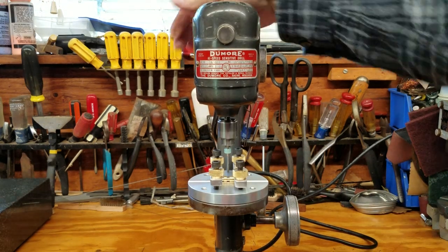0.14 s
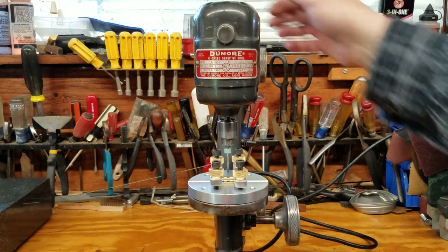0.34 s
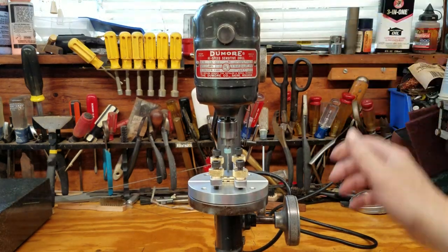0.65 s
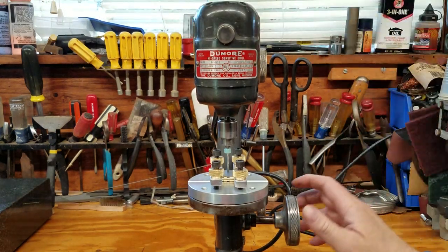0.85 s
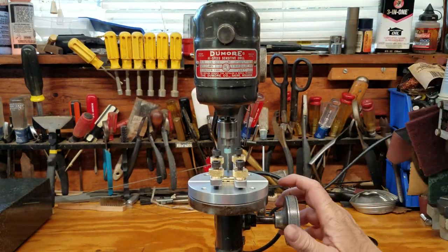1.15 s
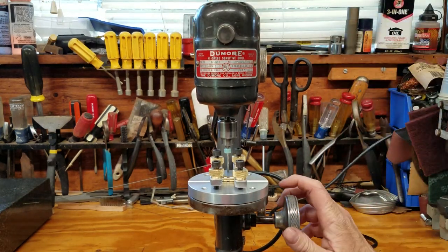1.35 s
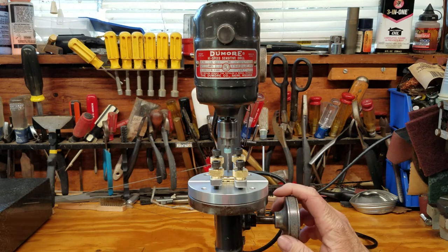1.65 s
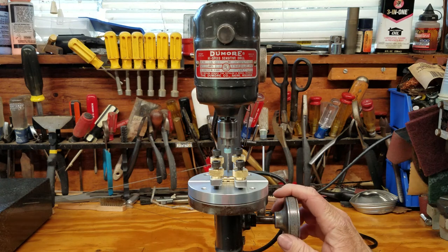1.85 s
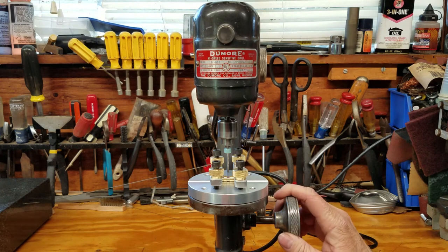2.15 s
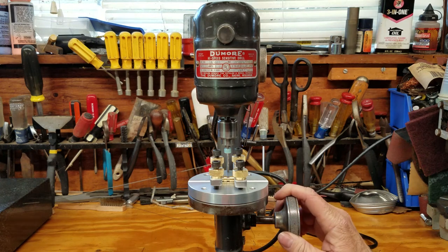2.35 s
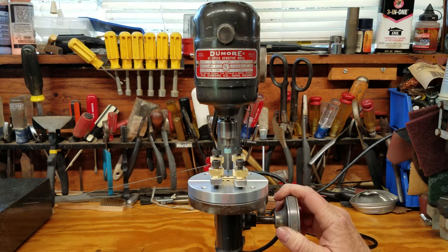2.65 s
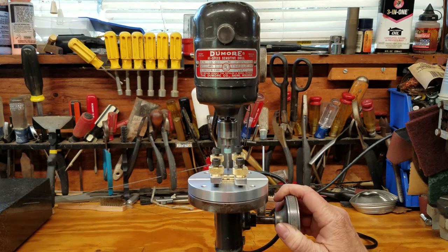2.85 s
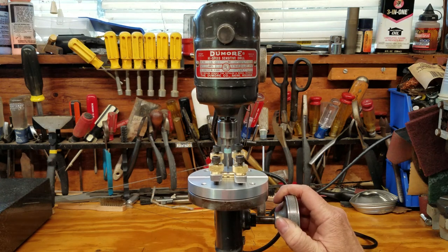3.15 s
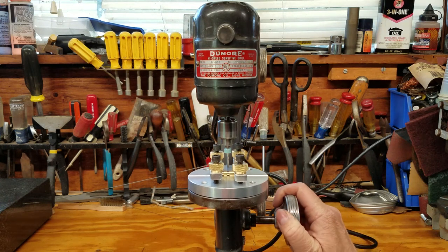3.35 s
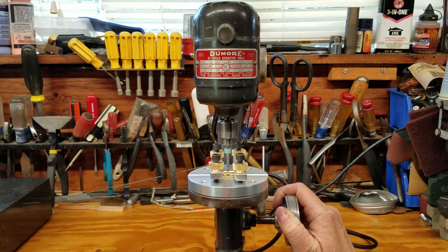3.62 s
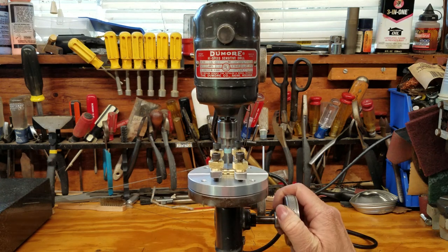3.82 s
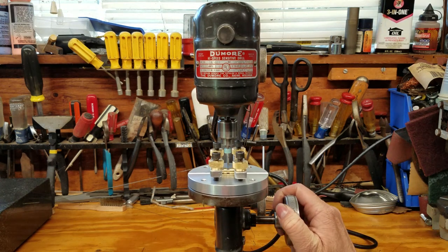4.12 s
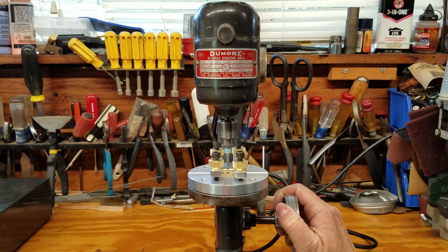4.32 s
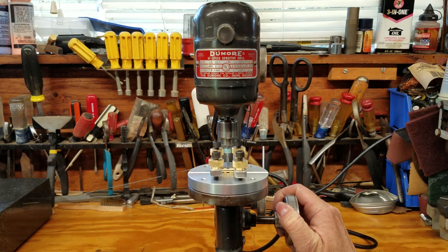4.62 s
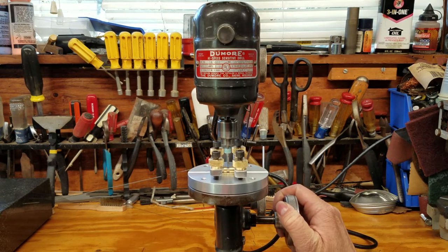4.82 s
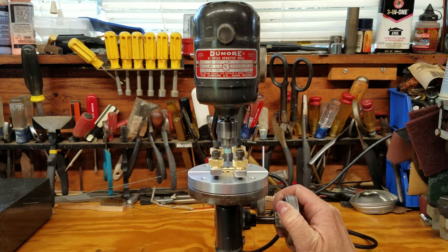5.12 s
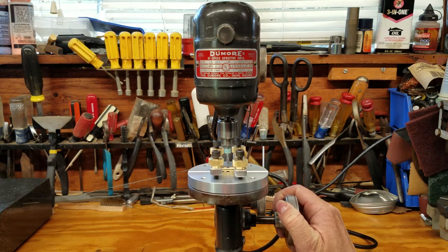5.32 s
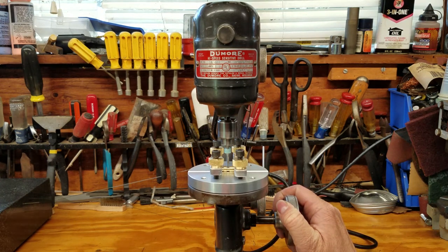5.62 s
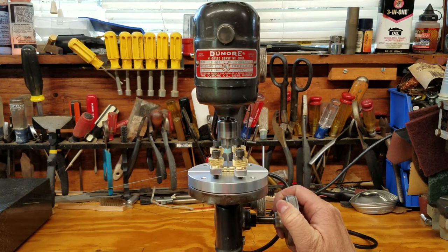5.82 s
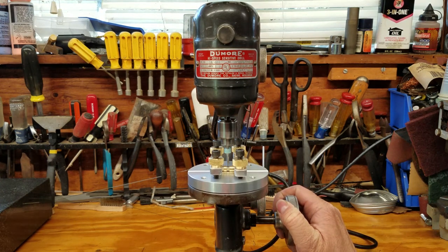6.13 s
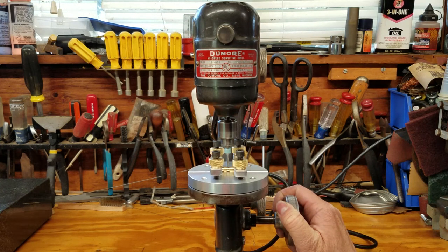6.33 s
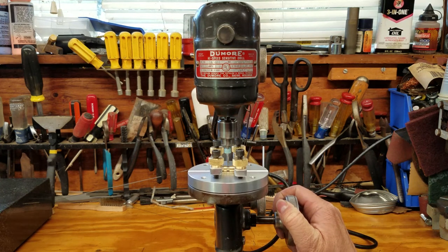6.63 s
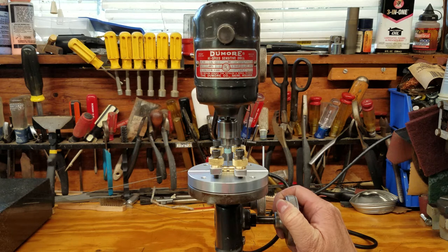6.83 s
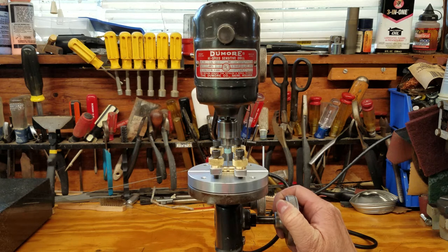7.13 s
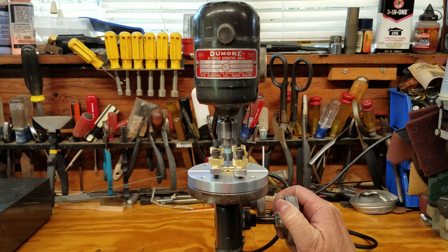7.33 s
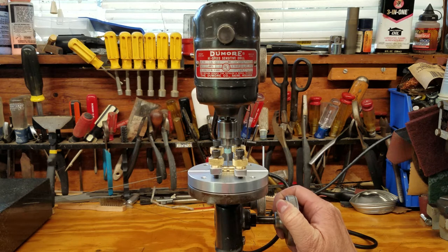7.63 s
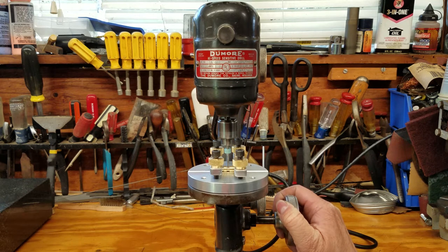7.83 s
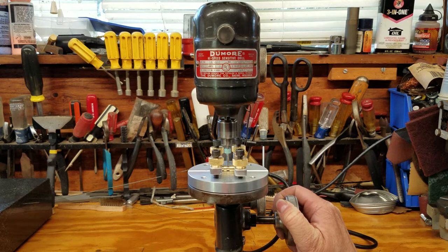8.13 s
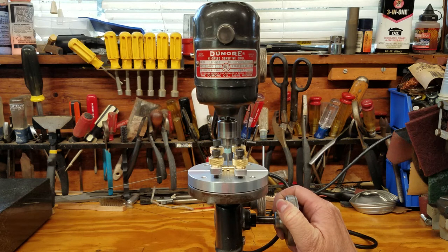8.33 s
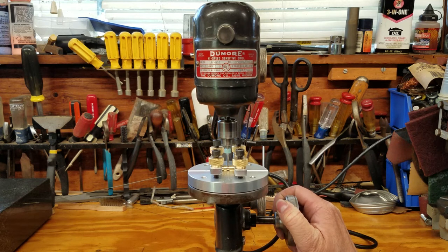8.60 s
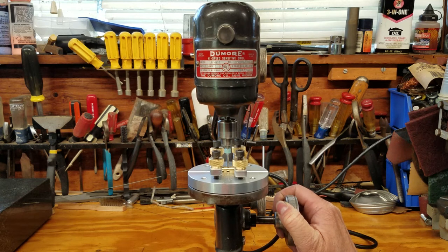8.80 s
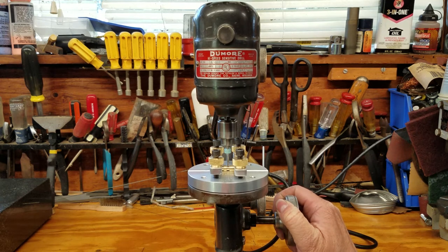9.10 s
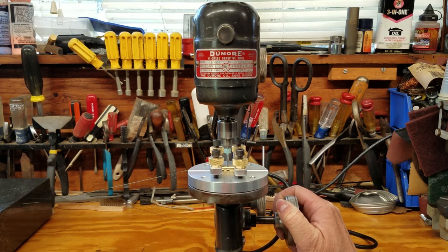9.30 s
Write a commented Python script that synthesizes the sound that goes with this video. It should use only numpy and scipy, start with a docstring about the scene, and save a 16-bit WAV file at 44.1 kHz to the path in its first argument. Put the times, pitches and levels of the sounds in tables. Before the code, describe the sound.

A small brush motor on a bench drill press, heard very close in a workshop. A short ring of the casing, then a fan whine climbs quickly, then ever more slowly, to a piercing steady pitch over low hum, bearing song and airy hiss. One dull knock of the hand wheel early on. Late, four feeds into metal make the pitch sag slightly, with brief dry scrapes.

```python
"""A small brush motor on a bench drill press, heard close up in a workshop: the casing rings at the start
while the motor runs up from about 6,800 towards 18,600 rpm, and the hand wheel knocks once on the way.
Sines locked to the shaft make the fan whine, unbalance hum and bearing song, which all glide upwards;
filtered noise makes the air, casing and brush rush. After 6.6 s the bit is fed into metal four times:
the speed sags, the hum is damped, and short bursts of band noise make the bit scrape."""
import sys
import numpy as np
from scipy import signal
from scipy.fft import rfft, irfft
from scipy.io import wavfile

SR = 44100
rng = np.random.default_rng(int(sys.argv[2]) if len(sys.argv) > 2 else 0)


def store_pcm(level_fs):
    """Save levels as 16-bit WAV."""
    pcm = np.round(np.clip(level_fs, -1, 1) * 32767).astype(np.int16)
    wavfile.write(sys.argv[1], SR, np.atleast_2d(pcm).T)


N = 417186
TIME = np.arange(N) / SR
BINS = np.arange(N // 2 + 1) * SR / N  # Hz
TOP_SPEED_HZ = 310.84  # free running speed of the shaft, turns per second


def undb(db):
    """Decibels to gain."""
    return np.exp(np.asarray(db) * (np.log(10) / 20))


def octaves(hz):
    """Octaves of shaft speed relative to the top speed."""
    return np.log2(hz / TOP_SPEED_HZ)


def spectra(table):
    """The columns of a frequency table, drawn out bin by bin along a log frequency axis."""
    hz, *columns = np.transpose(table)
    return [np.interp(np.log(BINS + 1), np.log(hz), column) for column in columns]


def bump(hz, centre_hz, width_hz):
    """Bell shape of a resonance, 1 at its centre and half at the edges of its width."""
    return 1 / (1 + (2 * (hz - centre_hz) / width_hz) ** 2)


def response(hz, table):
    """Gain in dB of a set of peaks and dips, one row for each level column."""
    return sum(np.outer(db, bump(hz, centre_hz, width_hz)) for centre_hz, width_hz, *db in table)


def walk(rate):
    """Slow random wander with a spread near 1, through `rate` random points per second."""
    points = rng.standard_normal(2048)
    return 1.203 * np.interp(TIME * rate, np.arange(len(points)), points)


def place(x, pan_db):
    """Share a sound between left and right at constant power; pan is left minus right."""
    tilt = undb(pan_db)
    return np.array([x * tilt, x]) * np.sqrt(2 / (1 + tilt ** 2))


def held(start, end, bite_s=0.18):
    """1 while the bit is in the metal, with short ramps as it takes hold and lets go."""
    return np.clip(np.minimum(TIME - start, end - TIME) / bite_s + .5, 0, 1)


# the run-up closes on the top speed in a quick and a slow stage: (speed still to gain f/Hz, time constant t/s)
RUN_UP = [(75.3, .343), (121.9, 1.508)]
# feeds of the bit into the metal: (start t/s, end t/s, speed loss under lasting drag f/Hz,
# hum damping reached towards the end level/dB)
CUTS = [(6.62, 6.86, 3.6, 6), (7.36, 7.57, 9.4, 6), (8.09, 8.56, 10.2, 10), (9.09, 9.6, 10.1, 16)]


def shaft_speed(inertia_s=1.05):
    """The motor runs up towards its top speed; each cut drags on it and inertia smooths the sag."""
    to_gain = sum(gap_hz * np.exp(-TIME / seconds) for gap_hz, seconds in RUN_UP)
    drag = sum(drag_hz * held(start, end) for start, end, drag_hz, _ in CUTS)
    keep = np.exp(-1 / (inertia_s * SR))
    sag = signal.lfilter([1 - keep], [1, -keep], drag)
    return TOP_SPEED_HZ - to_gain - sag


# shaft tones, the six-blade whine loudest: (cycles per turn, level/dB at top speed before trim and air path,
# slope level/dB per octave of speed, rise in a cut level/dB, left minus right level/dB)
TONES = [(2, -48.0, 49.1, 12, -7.7), (4, -39.4, 24, 5.8, 4.4), (6, -14.0, 26.5, -0.3, -0.2),
         (12, -37.1, 19.5, 0.4, -6.3), (18, -45.6, 28.1, -1.1, -0.0)]
# standing waves between fan and listener, peaks and nulls: (f/Hz, width f/Hz, left level/dB, right level/dB)
STANDING_WAVES = [(850, 110, 9, 6), (930.3, 93.4, 15.1, 3.3), (1100.9, 93.0, -15.7, -14.7),
                  (1215, 80, 3, 5), (1322.9, 136.7, -12.7, -4.6), (1519.9, 81.1, -13.2, -5.3),
                  (1639.8, 11.4, 5.0, -7.8), (1682.8, 36.4, -6.9, -5.2), (1745, 30, -3, -1),
                  (1792.5, 110.7, -31.3, -41.9), (1794.2, 59.7, 24.1, 34.0), (1817, 24, 3.5, 1),
                  (1846.8, 5.2, -4.0, -16.1), (2760, 120, 11, 14), (3263.5, 85.0, 7.7, 7.0),
                  (3664.1, 26.0, -1.1, -23.4), (4600, 110, 3, 9), (5220, 220, 2, 8), (5465, 120, 10, 13)]


def fan(angle, hz, cutting, tones_db=-1.8, whine_lag=0.91, flutter_db=0.64,
        tone_flutter_db=1.7, tone_blur=0.37, cavity_share=0.36):
    """Six blades whine cleanly, weaker shaft tones waver; all swell and fade gliding through standing waves."""
    path_db = response(BINS, STANDING_WAVES) + cavity_share * response(BINS, CAVITIES)
    _, lead = spectra(PORTS)
    out = np.zeros((2, N))
    for multiple, level_db, octave_db, cut_db, pan_db in TONES:
        tone_hz = multiple * hz
        db = level_db + octave_db * octaves(hz) + cut_db * cutting
        db = db + np.array([[pan_db], [-pan_db]]) / 2
        db = db + np.array([np.interp(tone_hz, BINS, side) for side in path_db])
        phase = multiple * angle
        if multiple == 6:  # the blades
            db = db + flutter_db * walk(25)
            left_ahead = -whine_lag  # radians
        else:
            db = db + tones_db + tone_flutter_db * walk(18)
            phase = phase + tone_blur * walk(30)
            left_ahead = np.interp(tone_hz, BINS, lead)
        out += undb(db) * np.sin(np.array([phase + left_ahead, phase]))
    return np.sqrt(2) * out  # levels are RMS


# resonances and dead spots of column and bench, crossed by the hum: (f/Hz, width f/Hz, level/dB)
STAND = [(143.6, 21.4, 7.7), (177.8, 48.9, -16.4), (219.3, 4.6, -9.5), (238.6, 15.7, 5.4),
         (254.6, 5.8, -17.4), (272.4, 22.4, 3.1), (302.0, 9.0, -11.9)]


def hum(angle, hz, level_db=-25, octave_db=22, pan_db=-2.7, flutter_db=0.9):
    """Unbalance shakes the stand once a turn; the bit steadies the spindle as it sinks in."""
    damped_db = 0
    for start, end, _, damping_db in CUTS:
        depth = (TIME - start) / (end - start)
        damped_db = damped_db + damping_db * held(start, end) * depth
    db = level_db + octave_db * octaves(hz) + response(hz, STAND)[0] - damped_db
    return np.sqrt(2) * place(undb(db + flutter_db * walk(14)) * np.sin(angle), pan_db)


# ball impacts per shaft turn in each bearing; the cage swings them once in each of its own turns
UPPER_BALLS, LOWER_BALLS, CAGE = 3.531, 3.235, .367
# upper cage sideband over the lower one; the harmonic itself against its sidebands
UPPER_SIDE_DB, CENTRE_DB = 3.5, -13
# harmonics of the ball impacts, before housing and slope: (harmonic, upper bearing loose level/dB,
# settled level/dB, lower bearing loose level/dB, settled level/dB)
BALL_HARMONICS = [(3, -43, -47, -50, -56), (4, -45.5, -39.5, -39.5, -45), (5, -44, -48, -68.5, -49),
                  (6, -44.5, -50.5, -51, -52), (7, -48, -50, -50, -45.5), (8, -71, -49, -42.5, -44),
                  (9, -45, -43.5, -56, -71), (10, -44, -39, -54, -79), (11, -51, -37.5, -53, -56),
                  (12, -53, -54, -51, -57), (13, -57, -55, -50, -65), (14, -51, -53, -50, -51),
                  (15, -60, -55, -63, -50), (16, -66, -60, -59, -49), (17, -61, -60, -61, -51)]
# single tones of commutator and bearings, before housing and slope: (cycles per turn, loose level/dB,
# settled level/dB, left minus right level/dB)
SINGING = [(5.36, -44, -56, -1), (7.81, -53, -36, 1), (9.81, -45, -52, -3), (11.6, -56, -44, 1),
           (24, -37, -38, 3), (36, -45, -43, -3), (40.46, -53, -48, 4), (42.42, -58, -43, 15),
           (47.05, -45, -52, 10)]
# balance of the ball harmonics: (f/Hz at top speed, left minus right level/dB)
BEARING_PAN = [(3000, -6.5), (6000, -10), (11000, -5), (12200, 5), (13200, 9), (15700, 14)]


def bearing_tones(faint_count=12, faint_db=-55):
    """The cage splits each ball harmonic into sidebands; rows are laid out like SINGING."""
    rows = list(SINGING)
    sidebands = [(-CAGE, -UPPER_SIDE_DB / 2), (CAGE, UPPER_SIDE_DB / 2)]
    for harmonic, *levels in BALL_HARMONICS:
        lines = sidebands + ([(0, CENTRE_DB)] if harmonic == 3 else [])
        for balls, (loose_db, settled_db) in ((UPPER_BALLS, levels[:2]), (LOWER_BALLS, levels[2:])):
            centre = harmonic * balls
            pan_db = np.interp(centre * TOP_SPEED_HZ, *np.transpose(BEARING_PAN))
            rows += [(centre + offset, loose_db + db, settled_db + db, pan_db) for offset, db in lines]
    # fainter, higher multiples, most of which glide out of hearing during the run-up
    multiples = np.linspace(50, 76, num=faint_count) + rng.uniform(-1, 1, size=faint_count)
    return rows + [(multiple, faint_db, faint_db, BEARING_PAN[-1][1]) for multiple in multiples]


# response of the housing that the bearing tones sweep through: (f/Hz, level/dB)
HOUSING = [(800, -7), (1100, 6), (2200, -5.5), (2385, 4), (2450, 0), (2700, 8.5), (2880, 17), (2990, 7.5),
           (3200, -11), (4200, -5.5), (4650, -3), (5100, -5), (6150, -5.5), (6550, 1.5), (6900, -9.5),
           (9000, 0.5), (10200, -5.5), (12000, -1), (12930, 17), (13130, 13.5), (14100, 13.5), (15700, 10)]


def bearings(angle, hz, level_db=1, octave_db=6, flutter_db=2.5, ripple_spread_db=5,
             slip=0.43, drift=1.4, short_hz=8000, settle_hz=296, settle_span_hz=6):
    """Balls slip a little (radians) and ring the housing; near top speed they settle and other tones take over."""
    settled = np.clip((hz - settle_hz) / settle_span_hz, 0, 1)
    housing_db, = spectra(HOUSING)
    # standing waves in the workshop make each gliding tone fade in and out until it settles
    ripple_points = rng.standard_normal(200)
    ripple_db = ripple_spread_db * np.interp(BINS, np.linspace(0, SR / 2, num=200), ripple_points)
    out = np.zeros((2, N))
    for multiple, loose_db, settled_db, pan_db in bearing_tones():
        tone_hz = multiple * hz
        at = np.minimum(tone_hz * N / SR, N // 2).astype(int)  # nearest bin below
        db = housing_db[at] + settled * settled_db + (1 - settled) * (loose_db + ripple_db[at])
        phase = multiple * angle + slip * walk(35)
        # short waves reach the far port out of step, and reflections off the bench shift them further
        lag = np.pi * tone_hz / 13000 + drift * walk(1.463) * np.minimum(tone_hz / short_hz, 1)
        ports = np.array([phase, phase - lag])
        sines = np.sin((ports % (2 * np.pi)).astype(np.float32))
        out += sines * place(undb(db + flutter_db * walk(22)), pan_db)
    return out * undb(level_db + octave_db * octaves(hz))


# the casing rings at the start, the hand wheel knocks, the bit scrapes:
# (peak t/s, centre f/Hz, width f/Hz, length t/s, RMS level/dB at the peak)
BURSTS = [(0.1, 1653, 60, .1, -24.5), (0.094, 510, 60, 0.16, -39), (.1, 2780, 350, .16, -38),
          (.7, 6480, 130, 2.4, -43), (1.493, 230, 130, 0.022, -35), (6.868, 4650, 250, .02, -29),
          (6.862, 8800, 3000, .03, -30), (7.32, 8150, 500, 0.038, -28.5), (7.603, 4700, 600, .02, -30),
          (7.605, 8000, 4000, .016, -31), (8.555, 9000, 1200, .03, -31)]


def bursts():
    """Short spells of ringing and friction: band noise under a bell-shaped swell."""
    out = np.zeros((2, N))
    noise = rfft(rng.standard_normal((2, N)))
    for peak_s, hz, width_hz, length_s, db in BURSTS:
        grit = irfft(noise * bump(BINS, hz, width_hz), N)
        swell = np.exp(-np.minimum((2 * (TIME - peak_s) / length_s) ** 2, 20))
        out += undb(db) * grit / grit.std() * swell
    return out


# rush of cooling air and brushes, before cavities and layer levels:
# (f/Hz, left level/dB per Hz, right level/dB per Hz)
RUSH = [(25, -90, -87), (80, -73.5, -72), (123, -78.5, -78), (420, -76, -72.5), (551, -74, -67),
        (990, -58.5, -62), (2050, -64, -62), (2900, -69.5, -64.5), (4220, -74.5, -76.5), (6800, -77.5, -76),
        (10800, -76, -70.5), (12170, -64.5, -65), (13300, -68, -83), (15700, -66, -67)]
# resonances of air passages and casing that colour the rush: (f/Hz, width f/Hz, left level/dB, right level/dB)
CAVITIES = [(470, 29, 10, 3.5), (594, 50, -5.5, 10), (665, 74, 11.5, 7.5), (852.7, 102, 5, 15.5),
            (957, 34, 12, 6), (1012, 120, 6, 12.5), (1210, 67, 1.5, 6.5), (1436, 28, 10, 0.5),
            (1613.5, 27, 14.5, 10), (1900, 46, -8, 4), (2220, 230, 0.2, -6), (2724, 190, 8, 0.5),
            (4390, 220, 2, 4.5), (5440, 470, 5.5, 9), (6410, 36, 19, 12), (7590, 550, 11, -6.5),
            (8810, 980, 7, 7.5), (10870, 250, 12.5, 7), (13150, 820, 10, -6)]
# likeness of the rush at the two ports: (f/Hz, correlation 0-1, left lead/rad)
PORTS = [(60, .96, 0), (480, .85, -.2), (610, .5, -2.6), (700, .6, 0), (880, .8, 1.3), (1200, .8, .7),
         (1800, .7, 0), (2700, .8, .1), (4500, .45, .3), (6300, .4, 2.4), (11000, .5, 3.0),
         (15000, .4, 3.2)]
# layers of the rush: (gain level/dB at top speed, slope level/dB per octave of speed, rise in a cut level/dB)
AIR, CASING, BRUSHES = (0.57, 9.8, 0.62), (0, 6, 0.71), (0, 9.1, 0.67)


def rush(angle, hz, cutting, split_hz=2100, hiss_hz=3600, bright_hz=8500, brighten=0.12, throb=0.079):
    """Fan air fills the passages, bearing rumble rings the casing; brushes hiss, pressed harder once a turn."""
    near, other = rfft(rng.standard_normal((2, N))) * np.sqrt(SR / 2)  # unit power per Hz
    alike, lead = spectra(PORTS)
    alike = np.clip(alike, 0, 1)
    left = near * np.exp(1j * lead)
    right = alike * near + np.sqrt(1 - alike ** 2) * other
    noise = np.array([left, right]) * undb(np.array(spectra(RUSH)) + response(BINS, CAVITIES))
    # nested low-passes, subtracted from each other to split the bands
    low, mid, high = (irfft(noise / (1 + (BINS / edge) ** 8), N) for edge in (split_hz, hiss_hz, bright_hz))
    air, casing, brushes = (undb(db + octave_db * octaves(hz) + cut_db * cutting)
                            for db, octave_db, cut_db in (AIR, CASING, BRUSHES))
    # faster sliding makes a brighter hiss
    brightest = (irfft(noise, N) - high) * (hz / TOP_SPEED_HZ) ** brighten
    hiss = high - mid + brightest
    return air * low + casing * (mid - low) + brushes * hiss * (1 + throb * np.sin(angle))


def scene(chatter_on_s=0.093):
    """One shaft drives the tones and the rush; cuts slow it and make it chatter a little past the push."""
    hz = shaft_speed()
    cutting = sum(held(start, end + chatter_on_s) for start, end, _, _ in CUTS)
    # a tiny random wander of the speed
    angle = 2 * np.pi * np.cumsum(hz * (1 + 0.000184 * walk(12))) / SR
    tones = fan(angle, hz, cutting) + hum(angle, hz) + bearings(angle, hz)
    return tones + bursts() + rush(angle, hz, cutting)


def record(dry, top_hz=15750):
    """A steep elliptic low-pass cuts off the top of the treble."""
    return signal.sosfilt(signal.ellip(12, .1, 80, top_hz, fs=SR, output="sos"), dry)


dry = scene()
out = record(dry)
store_pcm(out)
```